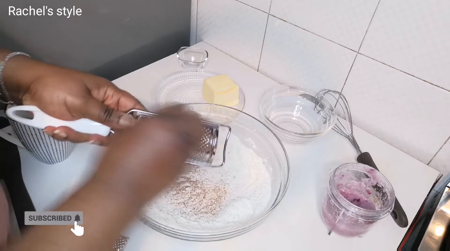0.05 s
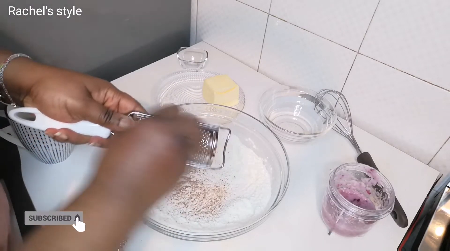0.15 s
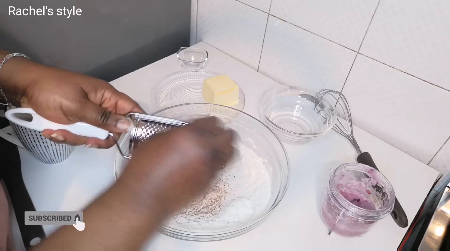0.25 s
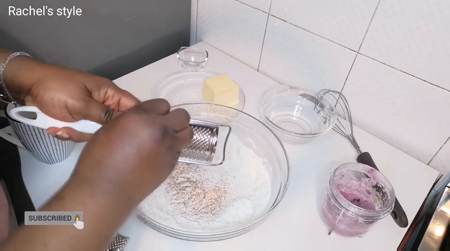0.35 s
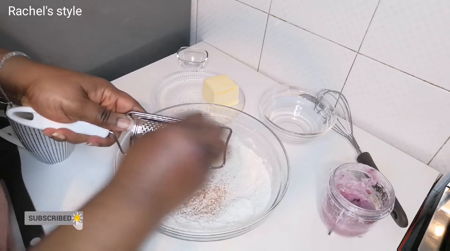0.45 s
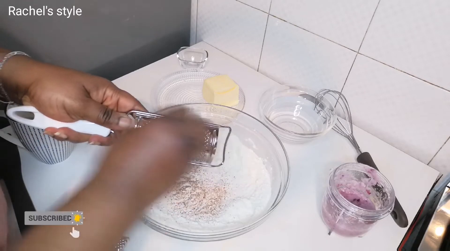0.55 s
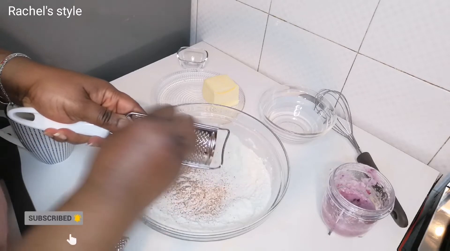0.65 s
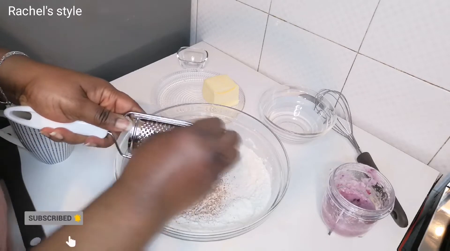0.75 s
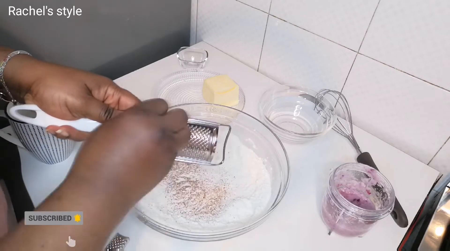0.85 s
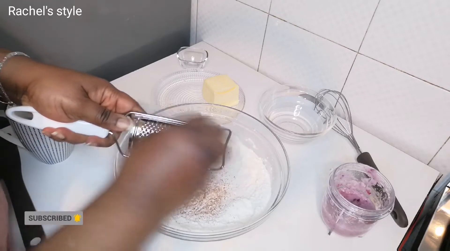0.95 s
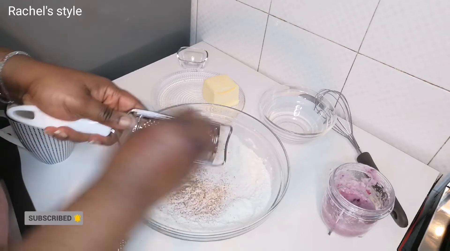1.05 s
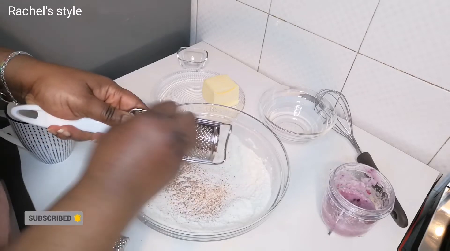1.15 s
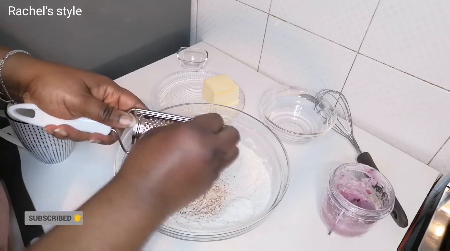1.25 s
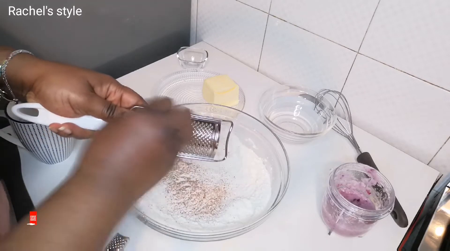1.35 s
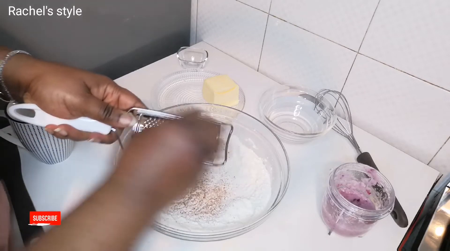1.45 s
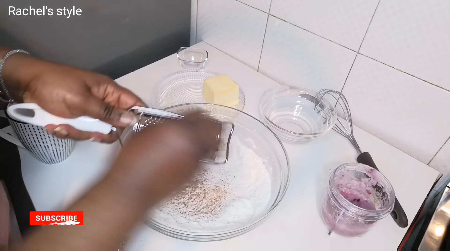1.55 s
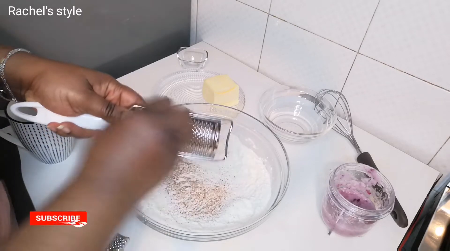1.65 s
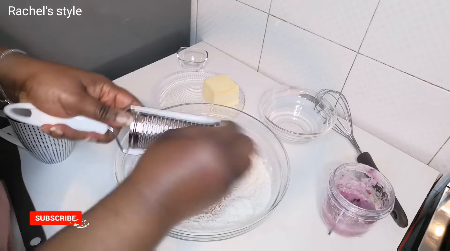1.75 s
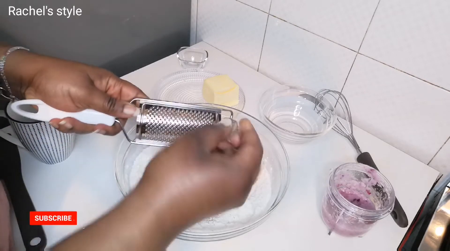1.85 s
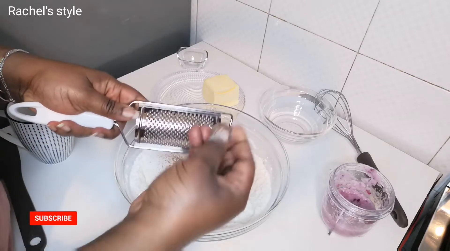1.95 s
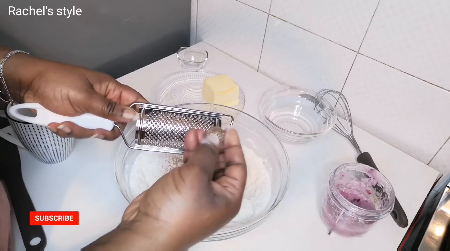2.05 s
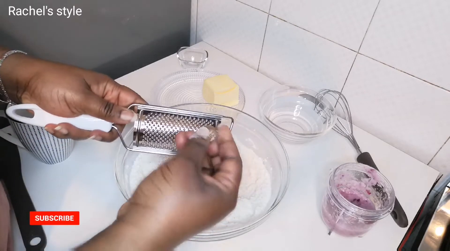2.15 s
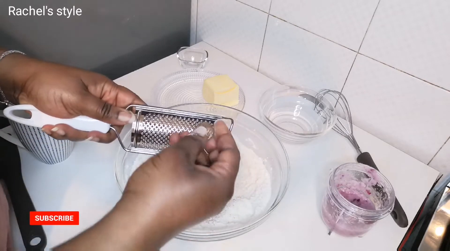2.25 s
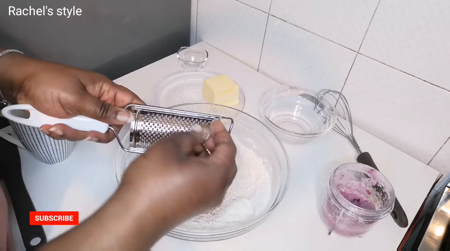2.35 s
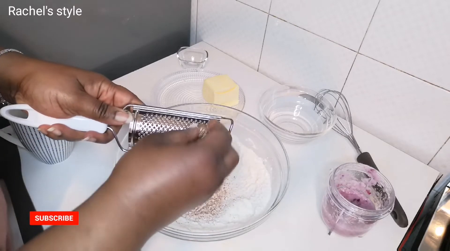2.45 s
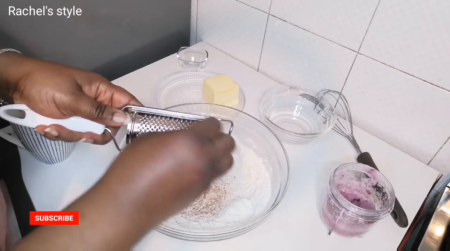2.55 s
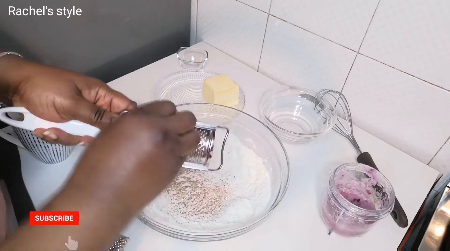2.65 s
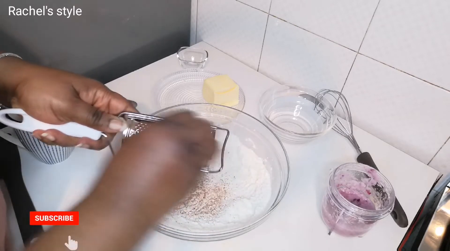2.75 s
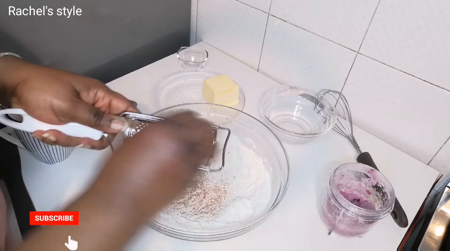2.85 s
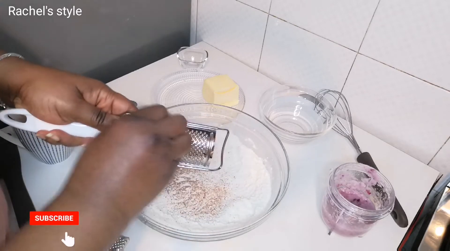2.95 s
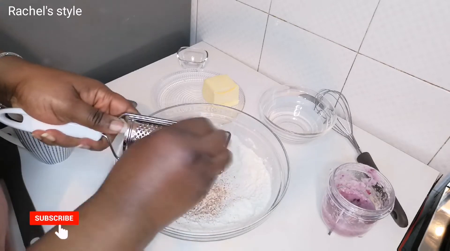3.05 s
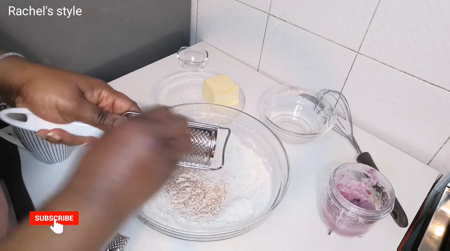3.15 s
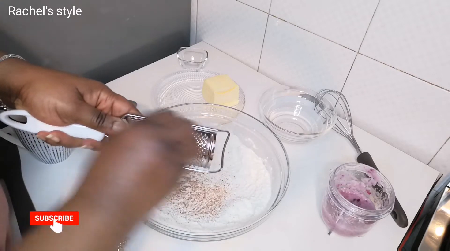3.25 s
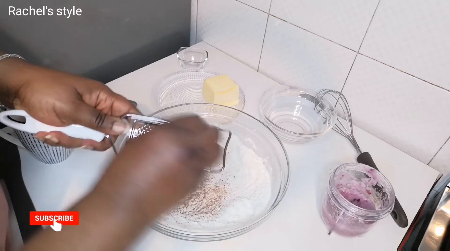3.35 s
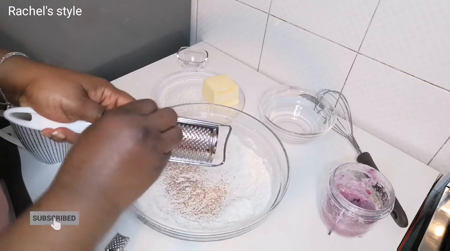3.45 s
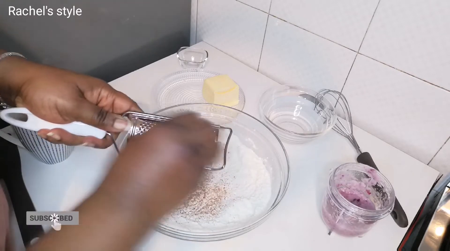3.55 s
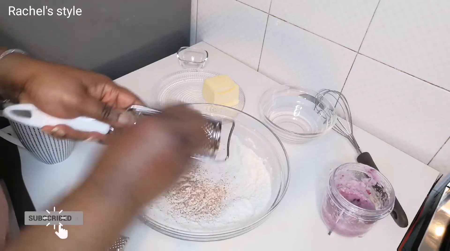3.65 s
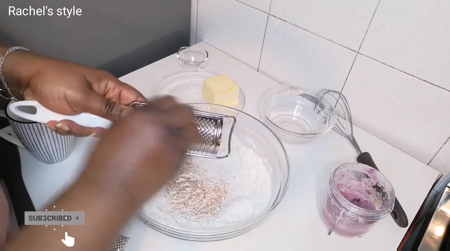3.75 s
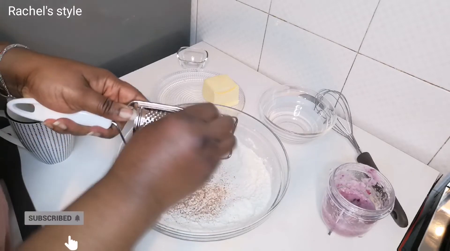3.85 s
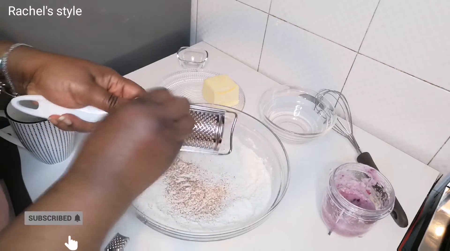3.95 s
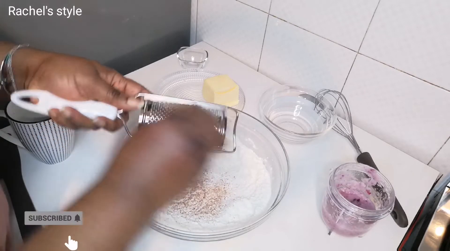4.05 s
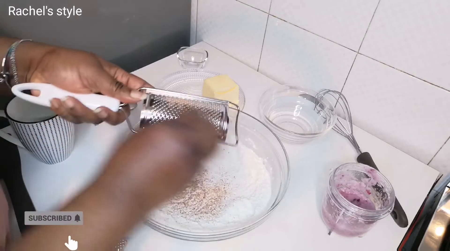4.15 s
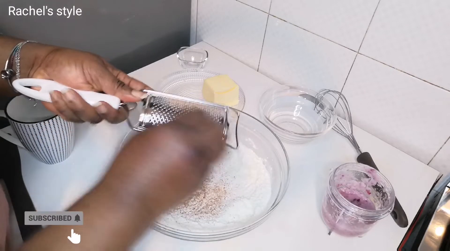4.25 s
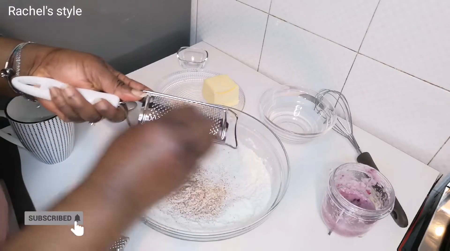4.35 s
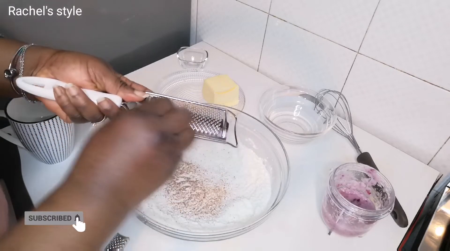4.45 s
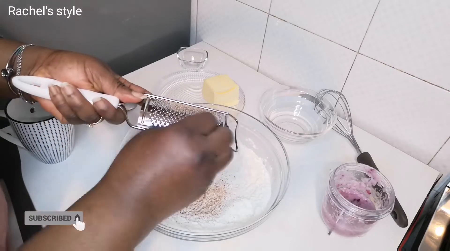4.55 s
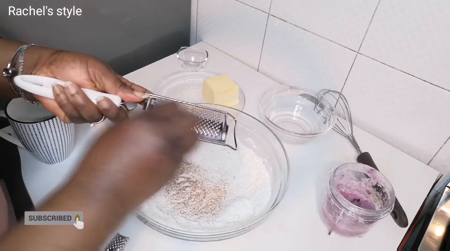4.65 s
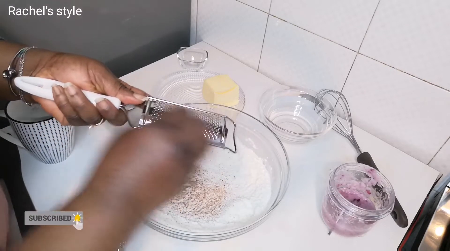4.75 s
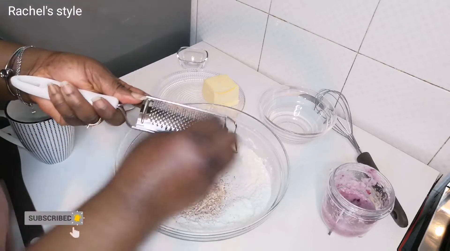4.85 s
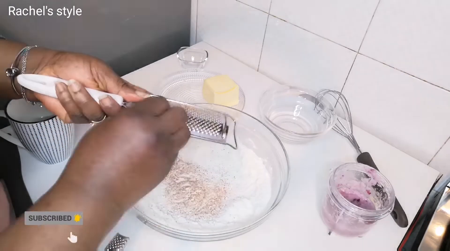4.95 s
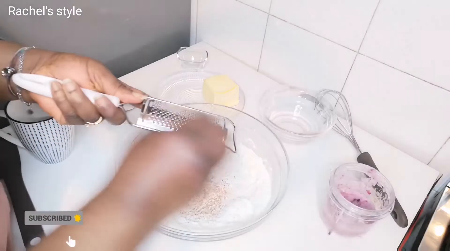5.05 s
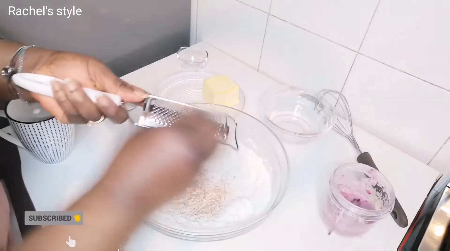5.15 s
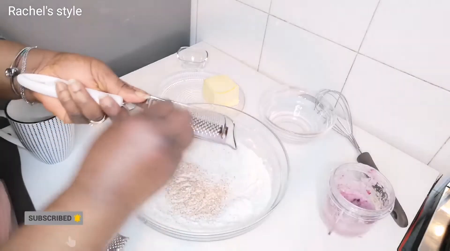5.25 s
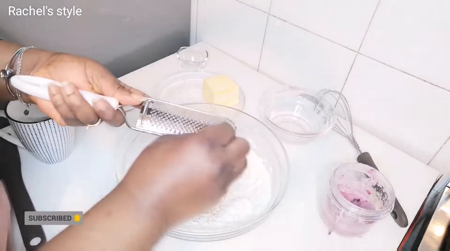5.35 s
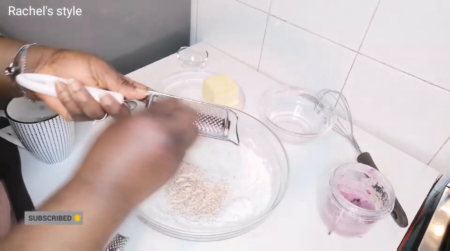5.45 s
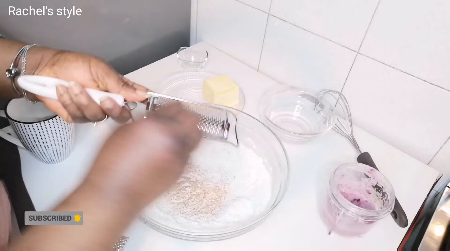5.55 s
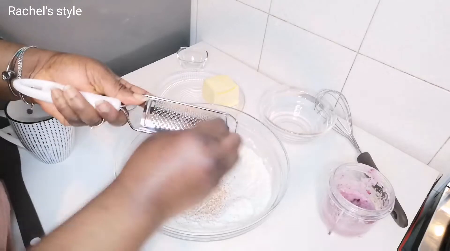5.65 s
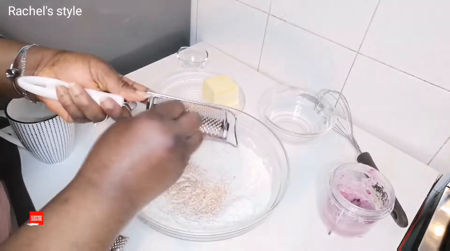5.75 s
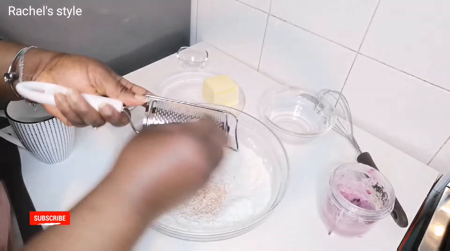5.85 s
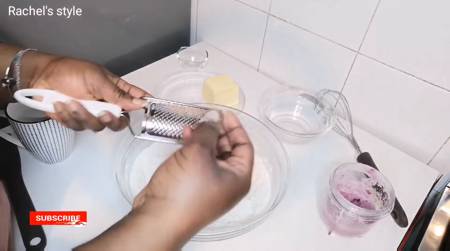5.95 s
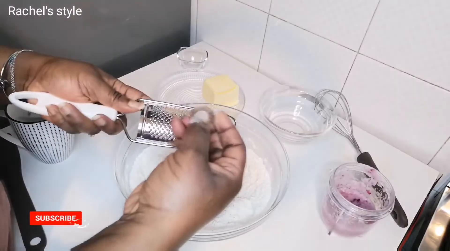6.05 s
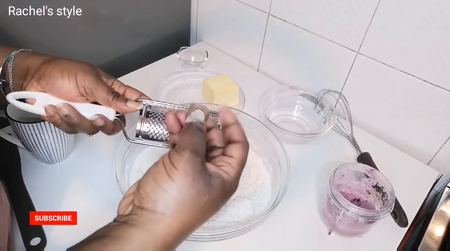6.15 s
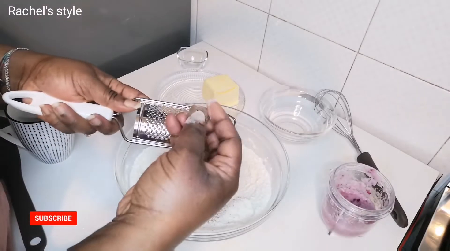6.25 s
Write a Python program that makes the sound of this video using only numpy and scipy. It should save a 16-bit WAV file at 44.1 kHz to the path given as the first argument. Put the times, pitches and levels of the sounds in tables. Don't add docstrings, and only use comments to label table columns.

```python
import sys
import numpy as np
from scipy import signal
from scipy.fft import rfft, irfft, next_fast_len
from scipy.io import wavfile
from scipy.ndimage import uniform_filter1d

SR = 44100
rng = np.random.default_rng(int(sys.argv[2]) if len(sys.argv) > 2 else 0)


def file_out(sig):
    cols = np.atleast_2d(sig).T
    lim = np.clip(cols, -1, 1)
    pcm = np.round(lim * 32767).astype(np.int16)
    wavfile.write(sys.argv[1], SR, pcm)


def boost_factor(decibels):
    exponent = np.asarray(decibels, float) / 20
    return 10 ** exponent


N = 277830

# (start [s], length [s], bite [dB], lean from start
# to end [dB])
RUBBING_STROKES = [(0.0, 0.043, -31, -9.5), (.073, 0.088, -32.5, 1.5), (.201, 0.092, -28.5, -2.5),
                   (.334, 0.077, -28.5, -2), (.442, 0.086, -28, 3), (.579, 0.081, -31.7, 1),
                   (.702, 0.068, -26, 1), (.823, 0.084, -33, 1.4), (.947, 0.074, -29, 0.5),
                   (1.072, 0.1, -35.5, -5.5), (1.198, 0.069, -27, -3), (1.32, 0.084, -31, -2),
                   (1.453, 0.072, -33.5, 0.5), (1.568, 0.081, -34, 3.5), (1.7, 0.08, -29.5, -3.5),
                   (1.818, 0.062, -31.5, 4.5),
                   (2.765, 0.071, -35, 4), (2.883, 0.076, -34.5, 0.2), (3.002, 0.089, -29, -3),
                  (3.133, 0.081, -36.5, 4.5), (3.261, 0.092, -30.5, -5), (3.384, 0.08, -35, 4),
                  (3.512, 0.085, -29, -1), (3.643, .084, -34, 3.5), (3.775, 0.076, -30, -2),
                  (3.892, 0.084, -34, 1), (4.024, 0.077, -32.5, -1.5), (4.159, 0.067, -40.5, -0.5),
                  (4.278, .085, -31.5, -5), (4.408, .078, -33.5, .1), (4.521, 0.087, -29.5, 3.5),
                  (4.67, 0.078, -36.5, 1.5), (4.79, 0.086, -35, 1.5), (4.924, 0.085, -36, 2.5),
                  (5.054, 0.079, -30, 0.5), (5.19, 0.085, -38.5, 1), (5.313, 0.076, -35, 4.5),
                  (5.438, .08, -37.5, 6), (5.568, 0.076, -28.5, 0.5), (5.694, 0.072, -34.5, 2.5),
                  (5.818, 0.078, -30, 0.5), (5.948, 0.018, -41, -2)]
STROKES = RUBBING_STROKES
# (time [s], frequency [Hz], level [dB])
BOWL_KNOCKS = [
    (.339, 351, -39),
    (1.322, 372, -41),
    (1.33, 589, -44),
    (2.771, 339, -47.5),
    (2.921, 347, -42),
    (4.06, 259, -48),
    (4.285, 582, -46),
]


def unit(x):
    return x / np.sqrt(np.mean(x ** 2) + 1e-20)


def along(points, hz):
    f, v = np.transpose(points)
    return np.interp(np.log(hz + 1), np.log(f + 1), v)


def coloured(x, spectrum):
    m = next_fast_len(N + 8192)
    gain = boost_factor(along(spectrum, np.fft.rfftfreq(m, 1 / SR)))
    return irfft(rfft(x, m) * gain, m)[:N]


def resonate(x, hz, width_hz):
    b, a = signal.iirpeak(min(hz, SR / 2.2), hz / max(width_hz, 1), SR)
    return signal.lfilter(b, a, x)


def wobble(rate):
    knots = rng.standard_normal(int(N * rate / SR) + 2)
    return np.interp(np.arange(N) * rate / SR, np.arange(len(knots)), knots)


def patchy(x, patchy_db):
    z = signal.stft(x, nperseg=256)[2]
    across_hz = uniform_filter1d(rng.standard_normal(z.shape), 4, 0)
    field = uniform_filter1d(across_hz, 7, 1)
    return signal.istft(z * boost_factor(patchy_db * unit(field)), nperseg=256)[1][:N]


def air():
    # (frequency [Hz], density [dB per Hz])
    hiss_spectrum = [(600, -2), (900, -5), (1300, -9.5), (1650, -13), (1980, -13), (2250, -13), (3300, -14),
                     (3900, -26.5), (6800, -13.5), (8800, -28), (14200, -23), (14900, -22), (15700, -31)]
    return boost_factor(-63.5) * unit(coloured(rng.standard_normal(N), hiss_spectrum))


def fridge():
    mains_hum_hz, hum_db = 100.045, -38
    shaft_hz, shaft_angle = 49.24, -.23
    # (frequency [Hz], width [Hz], level under the hum [dB])
    motor_tones = [(48.3, 6.6, -25.5), (200.3, 0.91, -29.5), (309.4, 2.8, -21), (302, 46, -23),
                   (2010, 130, -38.5)]
    # (multiple of the shaft, level under the hum [dB])
    shaft_orders = [(1, -29), (2, -26), (3, -27.5), (4, -30.5), (6, -26), (8, -29), (9, -32), (10, -28.5),
                    (12, -34), (14, -35), (17, -39), (39, -41), (40, -41)]
    # (frequency [Hz], density [dB per Hz])
    rumble_spectrum = [(71, -37.5), (120, -4), (129, -14), (301, -10.5), (495, -19.5), (555, -24.5),
                       (857, -27), (1500, -62), (1950, -82), (3300, -120)]
    # (frequency [Hz], density [dB per Hz])
    deep_spectrum = [(20, -12), (40, -11), (60, -11), (80, -7), (120, -9), (140, -9), (200, -63)]
    t = np.arange(N) / SR
    hum = np.sqrt(2) * np.cos(2 * np.pi * mains_hum_hz * t + 2.1)
    motor = np.zeros(N)
    for hz, width_hz, db in motor_tones:
        motor += boost_factor(db) * unit(resonate(rng.standard_normal(N), hz, width_hz))
    shaft_phase = 2 * np.pi * shaft_hz * t + shaft_angle
    for order, db in shaft_orders:
        motor += np.sqrt(2) * boost_factor(db) * np.cos(order * shaft_phase)
    rumble = boost_factor(-17) * unit(coloured(rng.standard_normal(N), rumble_spectrum))
    deep = boost_factor(-21) * unit(coloured(rng.standard_normal(N), deep_spectrum))
    return boost_factor(hum_db) * (hum + motor + rumble + deep)


def ducking(bite):
    knee_db, squeeze = -41.5, 0.47
    recover_s, ahead_s = 0.15, .12
    keep, ahead = np.exp(-1 / (recover_s * SR)), round(ahead_s * SR)
    coming = np.pad(bite ** 2, (0, ahead))
    power = signal.lfilter([1 - keep], [1, -keep], coming, zi=[np.mean(bite[:SR] ** 2)])[0][ahead:]
    return (1 + power / boost_factor(2 * knee_db)) ** (-squeeze / 2)


def kitchen(x):
    # (frequency [Hz], decay time t60 [s])
    decay_times = [(300, 0.81), (1500, 0.65), (4000, 0.45), (9000, 0.43), (15000, 0.31)]
    out, step = np.zeros(N + SR), SR // 4
    for a in range(0, N, step):
        hz, t, z = signal.stft(rng.standard_normal(3 * step), SR, nperseg=256)
        decay = boost_factor(-60 * t / along(decay_times, hz)[:, None])
        tail = signal.istft(z * decay, SR, nperseg=256)[1]
        echo = signal.fftconvolve(x[a:a + step], tail / np.linalg.norm(tail))[:SR - 300]
        out[a + 250:][:len(echo)] += echo
    return out[:N]


def contacts():
    # (time [s], peak level [dB])
    touches = [
        (2.7263, -32),
        (2.7581, -38),
    ]
    # (frequency [Hz], gain [dB])
    tick_spectrum = [(1500, -16), (4500, -22), (5200, -4), (7500, 2), (8500, -14), (10500, -11),
                     (12000, -18), (15000, -8)]
    ticks, knocks, t = np.zeros(N), np.zeros(N), np.arange(SR // 8) / SR
    for s, db in touches:
        ticks[round(s * SR):][:len(t)] += boost_factor(db + 3.5 - 60 * t / 0.024) * rng.standard_normal(len(t))
    for s, hz, db in BOWL_KNOCKS:
        onset = 1 - np.exp(-t / 0.0014)
        knocks[round(s * SR):][:len(t)] += boost_factor(db - 60 * t / 0.18) * onset * np.sin(2 * np.pi * hz * t)
    return coloured(ticks, tick_spectrum) + knocks


def pressure(rise=0.018, fall=0.02, drag_db=-52, snag=0.0019):
    # (time [s], extra bite [dB])
    snags = [(.251, -33), (.626, -33), (.885, -26), (1.077, -34), (1.125, -18), (2.784, -29), (2.837, -27),
             (3.339, -32), (4.163, -22.5), (4.186, -28), (4.22, -27), (4.227, -28), (4.449, -28),
             (4.847, -30), (4.93, -33), (5.002, -37), (5.11, -27), (5.366, -18), (5.5, -39), (5.697, -28),
             (5.745, -27), (5.884, -29)]
    # (from [s], level [dB])
    weights = [
        (0, -12.5),
        (2.3, -12.5),
        (4.35, -17.5),
    ]
    usual_db, weight_shrinks = -32, 0.59
    arch_db, arch_grows = 3.5, 0.61
    creep, grab_s = .62, .003
    slip_db, slip_spread_db = -36.5, 6
    time = np.arange(N) / SR
    bite, weight = np.zeros(N), np.zeros(N)
    slips = []
    for s, length, bite_db, lean_db in STROKES:
        u, v = rng.random(2)
        slips.append((s + u * length, slip_db + slip_spread_db * (2 * v - 1)))
        near = slice(max(round(s * SR) - SR // 20, 0), round(s * SR) + SR // 5)
        t = time[near]
        harder_db = bite_db - usual_db
        ends_db = bite_db - arch_db - arch_grows * harder_db
        arc_times = [s + 0.06 * length, s + length / 2, s + 1.03 * length]
        arc = boost_factor(np.interp(t, arc_times, [ends_db - lean_db, bite_db, ends_db + lean_db]))
        fade = np.minimum((t - s) / rise + 0.48, (s + length - t) / fall + 0.66)
        arc = arc * np.clip(fade, 0, 1) * np.where(t < s + grab_s, creep, 1)
        grip_db = [db for start, db in weights if start <= s][-1]
        low_db = grip_db - weight_shrinks * harder_db
        low_db = low_db - 2 * np.clip((t - s) / length - .5, -1, 1)
        bite[near] += arc
        weight[near] += arc * boost_factor(low_db)
    for s, db in snags + slips:
        near = slice(max(round(s * SR) - 800, 0), round(s * SR) + 800)
        bite[near] += boost_factor(db - 11.0) * np.exp(-((time[near] - s) / snag) ** 2 / 2)
    touching = (time < 1.88) | ((time > 2.78) & (time < 5.95))
    return bite + boost_factor(drag_db) * touching, weight


def crumbs(density, spread_db, hiss):
    sizes = rng.standard_normal(N) * boost_factor(spread_db * rng.standard_normal(N))
    catches = (rng.random(N) < density / SR) * sizes
    return unit(unit(catches) + hiss * rng.standard_normal(N))


def sings(spread=0.0068, width_hz=85):
    # (time [s], frequency [Hz], level [dB])
    loud_sings = [(.257, 8040, -36), (.61, 7000, -40.5), (1.257, 14990, -40), (1.331, 2650, -41),
                  (1.36, 8070, -39), (1.653, 6240, -42), (3.039, 2850, -40), (3.172, 8180, -40),
                  (3.425, 8150, -38.5), (4.184, 2550, -41.5), (4.303, 2630, -38), (4.846, 14990, -40),
                  (5.097, 7350, -48), (5.579, 5410, -38.5), (5.743, 5520, -36.5)]
    bellies_hz, belly_db = [2750, 7160, 7870, 14600], -13
    out, t = np.zeros(N + SR), np.arange(-2000, 2000) / SR
    passing = []
    for s, length, bite_db, _ in STROKES:
        u, v, w = rng.random(3)
        hz = bellies_hz[int(v * len(bellies_hz))] * (1 + 0.039 * (w - .5))
        passing.append((s + u * length, hz, bite_db + belly_db))
    for s, hz, db in loud_sings + passing:
        tone = unit(resonate(rng.standard_normal(3 * len(t)), hz, width_hz)[-len(t):])
        out[round(s * SR):][:len(t)] += boost_factor(db + 3) * np.exp(-(t / spread) ** 2 / 2) * tone
    return out[2000:N + 2000]


def ringing(drive, part, detune, swell_db):
    # (frequency [Hz], width [Hz], level [dB])
    flat_sheet = [(2643, 226, -3.5), (2940, 46, 2.5), (3330, 130, -7), (3725, 74, 0.5), (4060, 140, -12),
                  (5445, 97, 2), (5760, 190, -8.5), (6320, 350, 3.5), (7190, 130, 4), (7520, 180, 6.5),
                  (8125, 150, 1.5), (8040, 52, 7), (10200, 380, -6.5), (13350, 170, 2), (15140, 610, -3.5)]
    loose_sheet = [(2610, 113, 0), (3306, 130, 0), (3593, 67, -3), (4090, 64, -2), (4300, 64, -7.5),
                   (5390, 64, 2.5), (6170, 88, -3.5), (7220, 104, 8), (8160, 170, -1.5), (10430, 190, -2.5),
                   (13030, 110, -3), (13120, 180, -12), (13600, 300, -14), (15500, 550, 4.5)]
    tilted_sheet = [(2622, 61, -2.5), (3200, 60, -49), (4336, 40, -8), (5470, 490, -1), (6190, 150, -3),
                    (7140, 87, 6), (7770, 140, -5.5), (8110, 110, 1.5), (10230, 320, -11),
                    (11500, 110, -12), (12600, 85, -9), (13300, 170, -2.5), (13800, 230, -25),
                    (14800, 290, 2)]
    # (frequency [Hz], width [Hz], level [dB])
    flat_frame = [(342, 29, -21), (630, 61, 0.5), (1090, 96, -2), (1332, 54, 3), (1700, 200, -7),
                  (2064, 220, -3.5)]
    loose_frame = [(345, 39, -13), (642, 59, 1.5), (1184, 213, -3), (1610, 110, -4), (1722, 72, 1.5),
                   (2046, 106, 1.5)]
    tilted_frame = [(370, 40, -9), (578, 94, 5.5), (1120, 116, 5), (1350, 24, -14), (1629, 35, 6.5),
                    (2070, 12, 8)]
    holds = [(0, flat_sheet, flat_frame), (2.3, loose_sheet, loose_frame), (4.13, tilted_sheet, tilted_frame)]
    out = np.zeros(N + SR)
    edges = [round(max(row[0] - .01, 0) * SR) for row in STROKES] + [N]
    for a, b in zip(edges, edges[1:]):
        modes = [hold[part] for hold in holds if hold[0] * SR <= a][-1]
        norm = np.sqrt(sum(boost_factor(2 * db) * width for hz, width, db in modes) * np.pi / SR)
        stroke = np.pad(drive[a:b], (0, SR // 8))
        swell_at = np.arange(len(stroke)) * 30 / SR
        for k, (hz, width, db) in enumerate(modes):
            knots = np.clip(rng.standard_normal(40), -2.5, 1.4)
            swell = boost_factor(db + swell_db * np.interp(swell_at, np.arange(39), knots[1:]))
            tone = resonate(stroke * swell / norm, hz * (1 + detune * knots[0]), width)
            out[a:][:len(stroke)] += (-1) ** k * tone
    return out[:N]


def grater(bite, weight):
    # (frequency [Hz], density [dB per Hz])
    rasp_spectrum = [(880, -40), (1500, -25), (1720, -19.5), (2290, -10.5), (2600, -5), (3970, -9.5),
                     (6630, -3), (7240, 1.5), (8310, -2.5), (9440, -13), (11600, -11.5), (14800, -6.5),
                     (15800, -12)]
    # (frequency [Hz], gain [dB])
    thud_spectrum = [(200, -27), (400, 5), (1000, -8), (2000, -4), (3000, -2), (5000, -54)]
    teeth = crumbs(density=6000, spread_db=0.0, hiss=1.0) * boost_factor(0.56 * wobble(250))
    rasp = coloured(bite * teeth, rasp_spectrum) / np.std(coloured(teeth, rasp_spectrum))
    rasp = patchy(rasp, patchy_db=4.0)
    sheet = ringing(bite * teeth, part=1, detune=.011, swell_db=3.8)
    push = weight * crumbs(density=3300, spread_db=1.5, hiss=0.96)
    for s, hz, db in BOWL_KNOCKS:
        push[round(s * SR):][:SR // 100] += boost_factor(db + 4) * rng.standard_normal(SR // 100)
    frame = ringing(push, part=2, detune=0.016, swell_db=4.5)
    thud = coloured(push, thud_spectrum) / np.std(coloured(teeth, thud_spectrum))
    return boost_factor(-2.5) * sheet + boost_factor(-7) * rasp + boost_factor(-2.5) * frame + boost_factor(-10.0) * thud + sings()


def scene():
    # (frequency [Hz], gain [dB])
    roll_off = [(15100, 0), (15350, -7), (15730, -5)]
    bite, weight = pressure()
    near = coloured(grater(bite, weight) + contacts(), roll_off)
    return (near + boost_factor(-8.5) * kitchen(near) + ducking(bite) * fridge() + air())[None]


def top_cut(x):
    return signal.sosfilt(signal.butter(12, 15900, fs=SR, output="sos"), x)


def record(dry):
    # (frequency [Hz], gain [dB])
    microphone = [(15740, 0), (15870, -70)]
    limit = .19
    soft = dry[0] / (1 + np.abs(dry[0] / limit) ** 4) ** .25
    return top_cut(coloured(soft, microphone)[None])


dry = scene()
out = record(dry)
file_out(out)
```